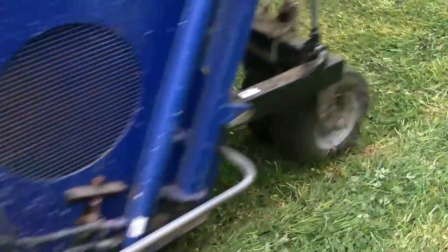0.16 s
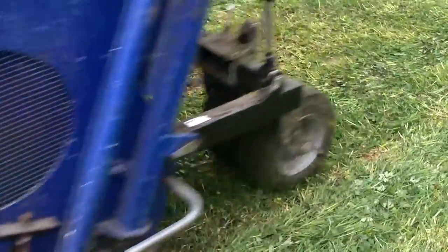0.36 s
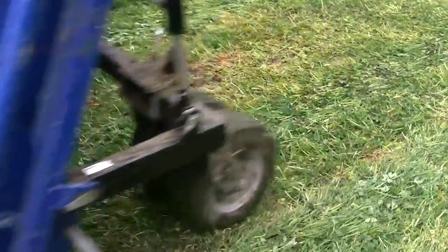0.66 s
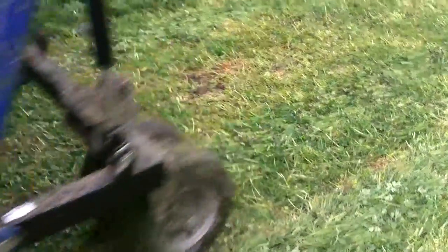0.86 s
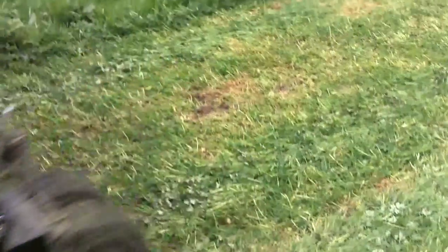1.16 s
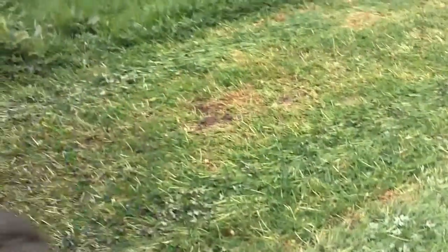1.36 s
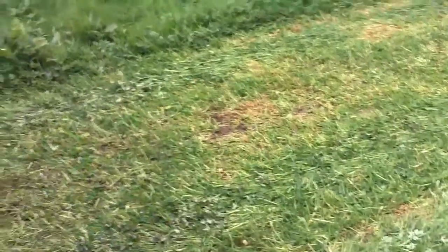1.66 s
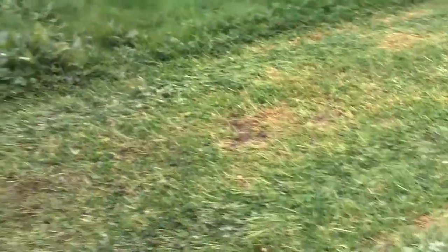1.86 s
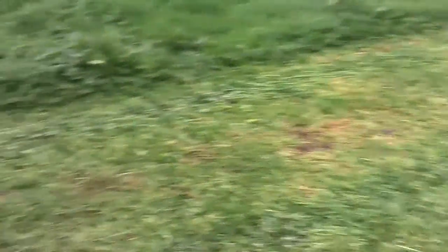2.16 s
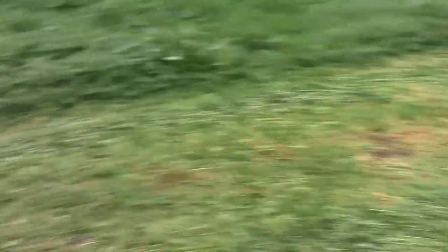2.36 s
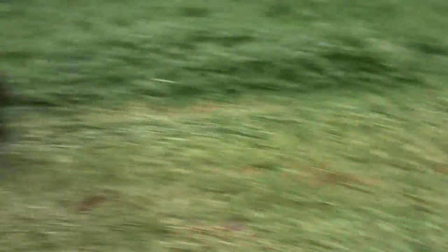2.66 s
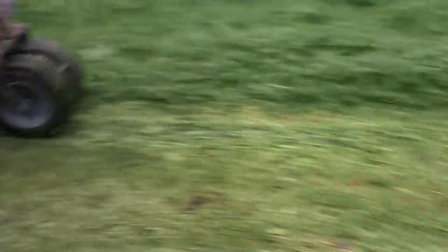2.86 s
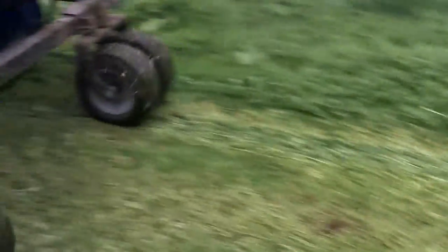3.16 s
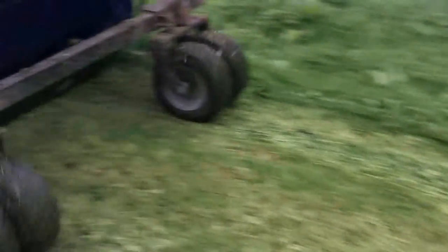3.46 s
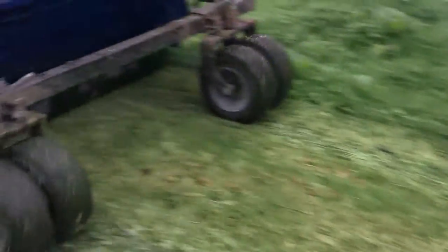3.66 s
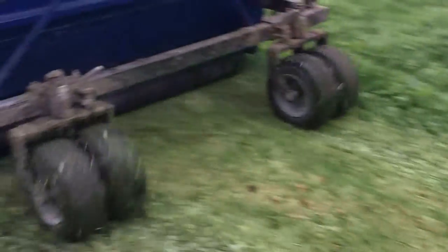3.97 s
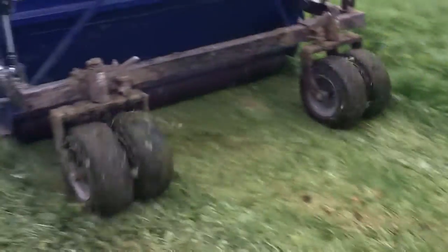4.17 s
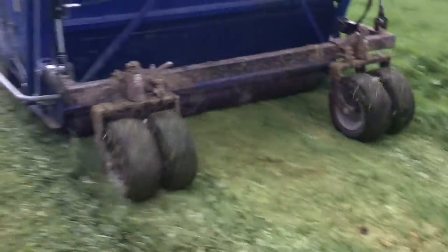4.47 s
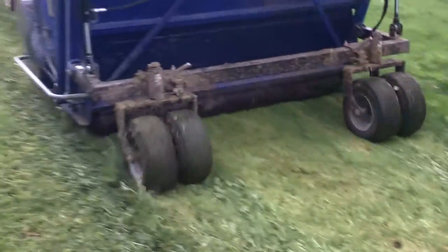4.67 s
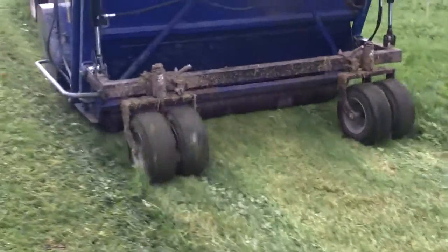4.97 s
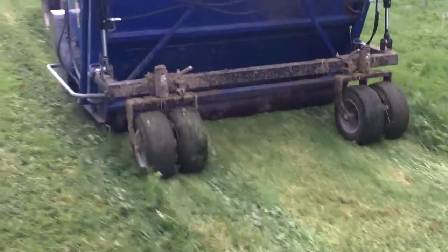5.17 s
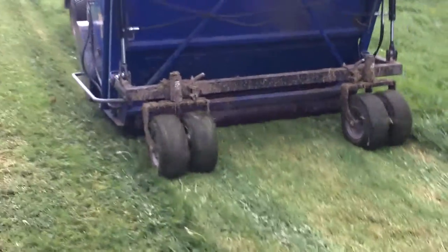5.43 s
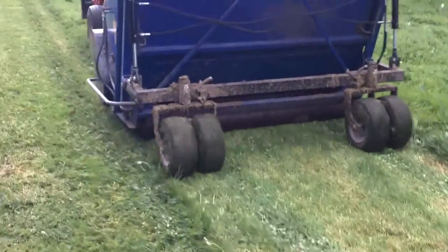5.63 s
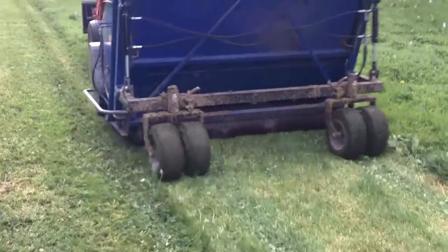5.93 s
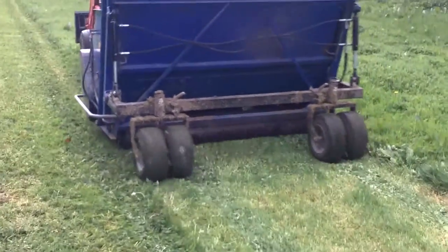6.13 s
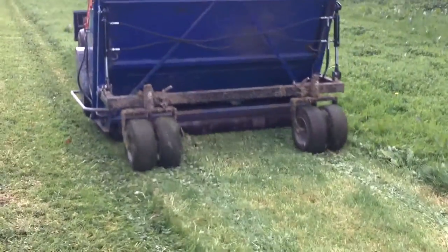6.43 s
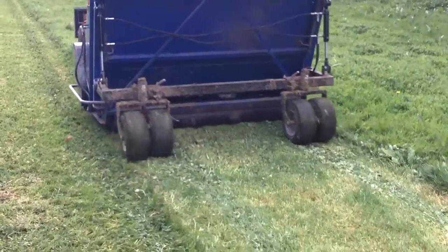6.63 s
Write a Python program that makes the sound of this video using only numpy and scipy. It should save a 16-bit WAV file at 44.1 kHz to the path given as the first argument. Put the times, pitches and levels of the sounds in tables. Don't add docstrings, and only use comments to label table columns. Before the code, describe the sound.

A grass-cutting machine runs continuously at close range, nearly centred and dry, with no room echo. Dense clacks of loose steel and a brief pump whine mark the passing flank; a hollow air rush swells around two seconds. The machine then recedes at constant speed, softer and duller on top, its low drone persisting under light wind.

```python
import sys
import numpy as np
from scipy import signal
from scipy.fft import irfft, next_fast_len
from scipy.io import wavfile
from scipy.ndimage import uniform_filter1d

SR = 44100
rng = np.random.default_rng(int(sys.argv[2]) if len(sys.argv) > 2 else 0)


def pcm_store(signal):
    levels = np.round(np.clip(np.atleast_2d(signal), -1, 1) * 32767)
    wavfile.write(sys.argv[1], SR, levels.astype(np.int16).T)


def voltage_ratio(decibels):
    exponent = np.asarray(decibels, float) / 20
    return 10 ** exponent


N = 299859

# start_s, distance_m
PATH = [
    (0, 2.05),
    (.4, 2.93),
    (1, 3.33),
    (1.8, 3.54),
    (2.6, 4.5),
    (3.3, 5.25),
    (3.8, 7.6),
    (4.5, 8.7),
    (5.5, 8.7),
    (6.8, 13.8),
]
PUMP_PER_HUM = 1.4704


def unit_rms(x):
    return x / np.sqrt(np.mean(x ** 2))


def columns(table):
    s, *rest = np.transpose(table)
    return [np.interp(np.arange(N) / SR, s, c) for c in rest]


def walk(rate_hz):
    hold = int(SR / rate_hz)
    steps = np.repeat(rng.standard_normal(N // hold + 1), hold)
    smooth = uniform_filter1d(uniform_filter1d(steps, hold), hold)
    return unit_rms(smooth[:N])


def band(hz, octaves, colour=((1, 0), (2, 0))):
    size = next_fast_len(N)
    f = np.arange(1, size // 2 + 2) * SR / size
    colour_hz, colour_db = np.transpose(colour)
    shape = np.cos(np.pi / 2 * np.clip(np.log2(f / hz) / octaves, -1, 1))
    shape *= voltage_ratio(np.interp(np.log(f), np.log(colour_hz), colour_db))
    phases = np.exp(2j * np.pi * rng.random(len(f)))
    return irfft(np.sqrt(size) * shape * phases, size)[:N]


def strikes(times, sizes, rise_s, decay_s):
    kicks = np.bincount(np.clip(np.asarray(times) * SR, 0, N - 1).astype(int), sizes, N)
    rise = np.exp(-1 / (rise_s * SR))
    decay = np.exp(-1 / (decay_s * SR))
    return signal.lfilter([1 - rise], np.convolve([1, -rise], [1, -decay]), kicks)


def tone(cycles, rms_db):
    return np.sqrt(2) * voltage_ratio(rms_db) * np.sin(2 * np.pi * (cycles + rng.random()))


def bump(at_s, width_s):
    return np.exp(-((np.arange(N) / SR - at_s) / width_s) ** 2)


def spreading_db():
    return 20 * np.log10(columns(PATH)[0] / 5)


def heard_db(at_5m_db, loss):
    return at_5m_db - loss * spreading_db()


def wind():
    # peak_s, thump_db, flutter_db
    gust_table = [(.15, -23, -34), (.42, -31, -34), (.89, -26, -27), (1.1, -36, -28), (1.21, -21, -28),
                  (1.38, -21, -24), (1.48, -26, -17), (1.73, -28, -25), (1.89, -36, -33), (2.37, -32, -27),
                  (2.55, -38, -34), (3.05, -33, -33), (3.22, -31, -35), (3.35, -47, -35), (3.52, -43, -32),
                  (3.8, -39, -41), (4.51, -42, -38), (4.83, -36, -43), (5.55, -35, -39), (5.9, -30, -36),
                  (5.97, -30, -42), (6.1, -32, -37), (6.52, -32, -35), (6.63, -29, -41), (6.8, -34, -37)]
    thump = voltage_ratio(heard_db(-38.5, .3))
    flutter = voltage_ratio(heard_db(-34, .41))
    for s, thump_db, flutter_db in gust_table:
        shape = bump(s, .056)
        thump += voltage_ratio(thump_db) * shape
        flutter += voltage_ratio(flutter_db - 9.5) * shape
    flutter *= voltage_ratio(walk(16))
    return thump * unit_rms(band(15, 2.33)) + flutter * unit_rms(band(74.4, 1.32))


def chute():
    roar_db = -59 + 26 * bump(1.94, 1.5)
    return voltage_ratio(roar_db + 2 * walk(16)) * unit_rms(band(506, .33))


def clanks():
    # start_s, peak_db, low_ring_db, top_db
    strike_table = [(0.0503, -11.5, -24, -47), (0.0944, -12, -44, -45), (0.3702, -8, -21, -33),
                    (0.4473, -24, -21, -34), (0.5284, -22, -22, -35), (0.5965, -12, -30, -34),
                    (0.74, -14, -28, -38), (0.929, -12, -17.5, -32.5), (0.9672, -12, -19.5, -36),
                    (1.114, -15, -25, -42), (1.1286, -14.5, -22, -33), (1.2445, -17.5, -30, -47),
                    (1.2844, -13, -28, -38), (1.53, -27, -22, -44), (1.566, -11.5, -31, -39),
                    (1.6037, -19, -26, -42), (1.926, -14, -30, -44.5), (1.963, -13, -31, -43),
                    (2.363, -13, -27, -41), (2.483, -11, -21.5, -56), (2.7294, -19, -34, -47),
                    (2.836, -15.5, -34, -47), (2.904, -16.5, -26.5, -48), (3.103, -22, -26, -43),
                    (3.1807, -18, -27, -43), (3.6154, -21.5, -30, -56), (4.209, -23, -40, -46),
                    (4.467, -22.5, -30, -51), (4.919, -25, -36, -43), (6.4494, -26, -31, -40)]
    s, peak_db, low_db, top_db = np.transpose(strike_table)
    ring = strikes(s, voltage_ratio(low_db - .5), rise_s=.0013, decay_s=.014) * unit_rms(band(980, 3.09))
    crack = strikes(s, voltage_ratio(peak_db - 7.5), rise_s=.001, decay_s=.0051) * unit_rms(band(2980, 1.04))
    top_noise = unit_rms(band(9500, 1, ((9000, 0), (15000, -5))))
    top = strikes(s, voltage_ratio(top_db + 1.5), rise_s=.001, decay_s=.003) * top_noise
    return ring + crack + top


def knock(cycles):
    cylinder_db = (4, -2.5, -3.5)
    firing = np.floor(3 * cycles + 2.65).astype(int)
    at = np.flatnonzero(np.diff(firing))
    scatter_db = 4 * rng.standard_normal(N // 300)[:len(at)]
    sizes = voltage_ratio(np.array(cylinder_db)[firing[at] % 3] + scatter_db)
    return strikes(at / SR, sizes, rise_s=.0072, decay_s=.0056)


def rush(knocks, rows):
    centre_hz = (450, 1100, 2700, 7000)
    loss_share = (0.92, 0.76, 0.98, 0.64)
    # frequency_hz, density_db
    flow_colour = [(60, 1), (150, 19), (300, 17.5), (450, 13), (600, 10.5), (700, 7.5), (3000, 0),
                   (4900, 0), (5100, -4.5), (6500, -10.5), (7500, -21), (10000, -15), (11500, -27),
                   (13500, -20), (15000, -23)]
    # start_s, load_db
    grass = [(0, 0), (.34, -0.5), (.7, -0.5), (1.2, 0.5), (1.7, -1), (2.1, 1), (2.3, -0.5), (2.6, 1.5),
             (3.0, -1), (3.7, -1), (4.1, 2), (4.45, -1.5), (4.8, 0.5), (5.4, 0), (5.9, 0.5), (6.2, 0),
             (6.5, 2.5), (6.8, 2)]
    curves = -np.outer(loss_share, spreading_db())
    curves -= curves.mean(1, keepdims=True)

    metres, = columns(PATH)
    dip_hz = np.interp(metres, (3.4, 9), (930, 524))
    dip_db = np.interp(metres, (3, 5.5), (0, 9.5))

    clipping_sizes = voltage_ratio(2.4 * rng.exponential(size=2400))
    clippings = strikes(rng.random(2400) * N / SR, clipping_sizes, rise_s=.00027, decay_s=.0015)
    shake = .68 * knocks + .1 * np.cos(2 * np.pi * rows) + .15 * clippings
    load = walk(6.6) + 2 * columns(grass)[0]

    air = np.zeros(N)
    for hz in 63 * 2 ** np.arange(0, 8.1, 1 / 3):
        place = np.interp(np.log(hz), np.log(centre_hz), np.arange(4))
        db = np.maximum(1 - abs(place - np.arange(4)), 0) @ curves
        upper = np.clip(np.log2(hz / 600) / 1.87, 0, 1)
        upper *= np.interp(hz, (8000, 13000), (1, .55))
        db = db * np.clip(hz / 420, 0, 1) + 1.03 * walk(15)
        db += .5 * upper * load
        db -= dip_db * np.exp(-(np.log2(hz / dip_hz) / .25) ** 2)
        db -= .23 * dip_db * np.exp(-(np.log2(hz / (3 * dip_hz)) / .14) ** 2)
        air += voltage_ratio(db) * (1 + upper * shake) * band(hz, 1 / 3, flow_colour)
    air -= .24 * signal.lfilter(*signal.iirpeak(1740, 7, SR), air)
    return voltage_ratio(-29) * air


def pump(rows):
    # multiple, level_db
    harmonics = [(3, 0), (4, -.5), (5, 1), (6, .5), (7, 0), (8, -3), (9, -2), (10, .5), (11, -2), (12, -6)]
    tooth_db = heard_db(-44.5, .9) + 13 * bump(.47, .55)
    second_db = heard_db(-51, 1.1) + 15 * bump(2.24, 1.14)
    overtone_db = heard_db(-46.5, 1.36)

    mesh = PUMP_PER_HUM * rows
    teeth = mesh + .05 * walk(18) + .012 * walk(70)
    whine = tone(teeth + .05 * walk(20), tooth_db - .6 + 1.8 * walk(24))
    whine += tone(2 * teeth + .07 * walk(25), second_db - 4.5 + 3 * walk(22))
    for multiple, db in harmonics:
        whine += tone(int(multiple) * teeth + .08 * walk(30), overtone_db + db - 3.5 + 3 * walk(24))
    return whine, mesh / 11


def rotor():
    # start_s, hum_hz, hum_db
    hum_curve = [(0, 189.2, -23), (.4, 188.3, -22.5), (.8, 188.8, -19.5), (1.3, 188.7, -20),
                 (1.7, 187.7, -19.5), (2.2, 188.2, -17.6), (2.6, 187.8, -16.8), (3.1, 188.4, -16.6),
                 (3.6, 189.0, -16), (4.15, 187.8, -15.6), (4.45, 188.5, -15.2), (4.8, 189.6, -16),
                 (5.2, 189.5, -15.2), (5.55, 188.9, -16), (6, 188.9, -15.7), (6.25, 188.4, -15.2),
                 (6.8, 188.2, -16.2)]
    hum_hz, hum_db = columns(hum_curve)
    fifth_db = heard_db(-40.5, -.58)
    shaft_db = heard_db(-34.5, .25)
    eighth_db = heard_db(-36, .19) - 11 * bump(4.17, .71)

    turns = np.cumsum(hum_hz * (1 + .001 * walk(25))) / SR / 4
    rows = 4 * turns
    hum = tone(rows, hum_db + .55 * walk(24) + .4 * walk(8))
    fifth = tone(5 * turns, fifth_db + 3 * walk(9))
    eighth = tone(8 * turns, eighth_db + 1.3 * walk(12))
    shaft = tone(turns, shaft_db + 4 * walk(11))
    return hum + voltage_ratio(-.7) * fifth + voltage_ratio(2.3) * eighth + voltage_ratio(-2.5) * shaft, rows


def scene():
    hum, rows = rotor()
    whine, cycles = pump(rows)
    sound = wind() + chute() + clanks() + rush(knock(cycles), rows) + whine + hum
    return np.array([sound, sound])


def low_pass(x):
    return signal.sosfilt(signal.butter(12, 15730, fs=SR, output="sos"), x)


def record(dry):
    # frequency_hz, width_hz
    nulls = [(4200, 980), (7760, 690), (7980, 910), (8800, 880), (12560, 420), (12680, 670)]
    x = dry[0]
    treble = signal.sosfilt(signal.butter(2, 8000, "high", fs=SR, output="sos"), x)
    stray = voltage_ratio(-5) * treble * np.array([walk(250), walk(250)])

    late = np.r_[x[0], x[:-1]]
    middle = (late + x) / 2
    side = (late - x) / 2
    low_side = signal.sosfiltfilt(signal.butter(2, (215, 1650), "band", fs=SR, output="sos"), side)
    dropped = np.clip(.9 + .6 * walk(20), 0, 1)
    mix = middle + np.outer([1, -1], side - dropped * low_side) + stray

    for hz, width_hz in nulls:
        mix = signal.lfilter(*signal.iirnotch(hz, hz / width_hz, SR), mix)
    mix = signal.sosfilt(signal.ellip(8, .2, 70, 15030, fs=SR, output="sos"), mix)
    return low_pass(mix)


dry = scene()
out = record(dry)
pcm_store(out)
```